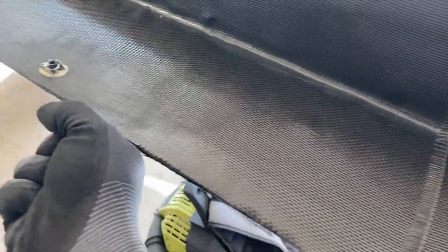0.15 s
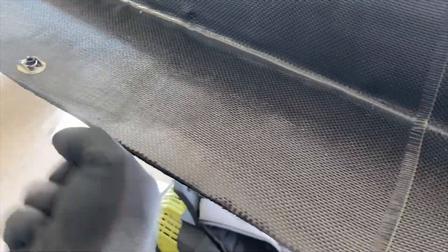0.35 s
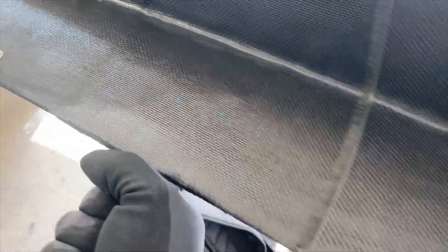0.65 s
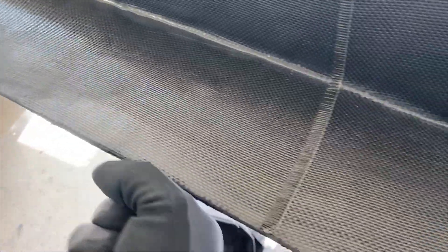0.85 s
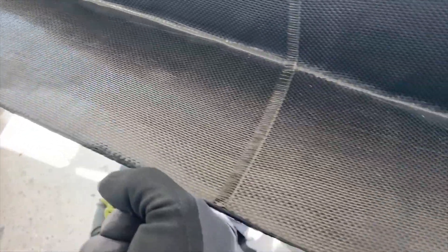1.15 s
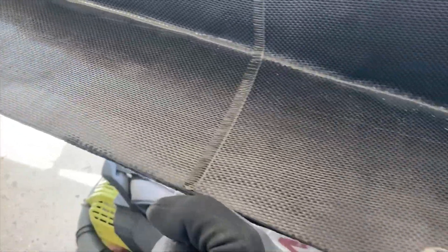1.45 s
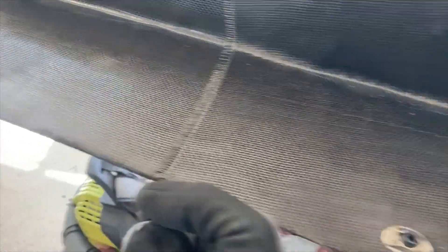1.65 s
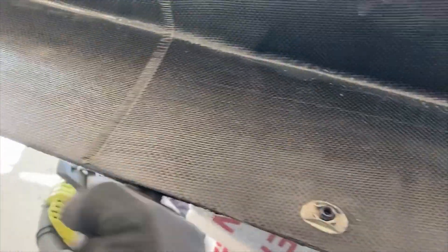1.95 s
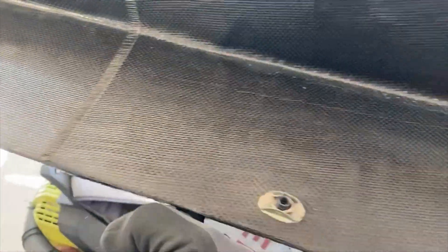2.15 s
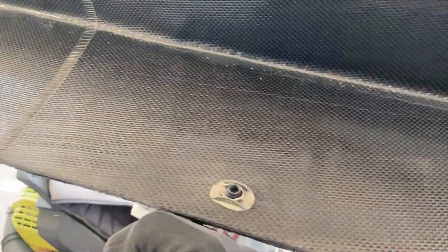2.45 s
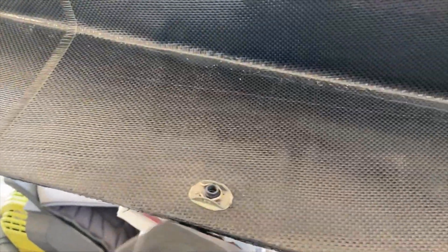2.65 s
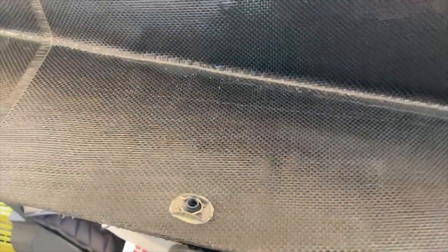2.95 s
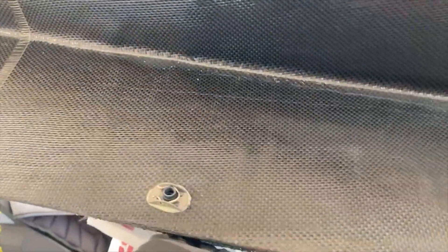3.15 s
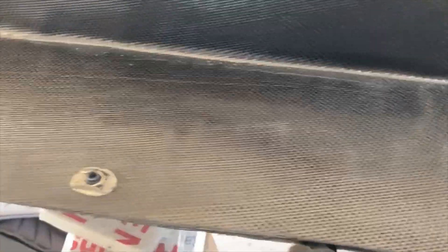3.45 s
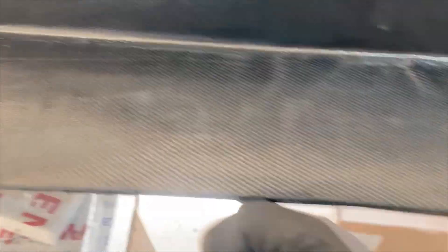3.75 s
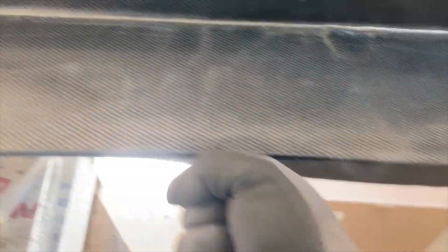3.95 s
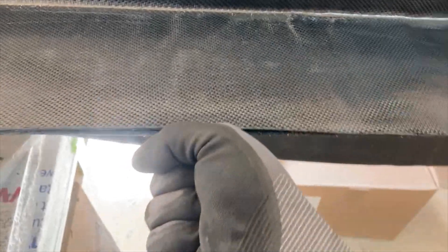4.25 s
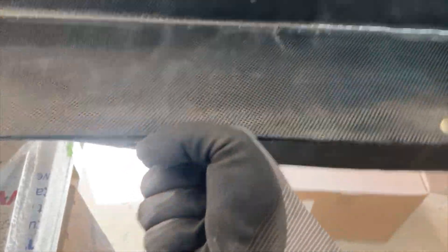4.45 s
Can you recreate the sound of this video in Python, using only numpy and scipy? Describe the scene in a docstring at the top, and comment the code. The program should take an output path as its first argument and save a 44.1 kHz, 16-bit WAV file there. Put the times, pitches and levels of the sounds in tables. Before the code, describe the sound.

A carbon-fibre shell peels away from the form beneath it in uneven bursts, heard from close by. Light ticks and crackles come first, over soft glove scuffing. A brief pause follows, then harder pulls set off bright, sharp cracks and a quick volley of snaps, the shell booming and creaking with a faint low rumble. A final crack ends it, with a short workshop echo.

```python
"""A workshop, close up: a cured carbon-fibre mould half is pried off its plug.
Each pull peels the bond in a fizz of tiny fractures and makes the big shell boom;
larger patches let go with sharp cracks that ring in the laminate and hang in the room.
Underneath, a glove rubs the flange and the loosened shell sways with a low rumble."""
import sys
import numpy as np
from scipy import signal
from scipy.fft import rfft, irfft
from scipy.io import wavfile
from scipy.ndimage import uniform_filter1d

SR = 44100
rng = np.random.default_rng(int(sys.argv[2]) if len(sys.argv) > 2 else 0)


def file_out(sig):
    """Save sig as 16-bit WAV at sys.argv[1]."""
    # one column per channel
    cols = np.atleast_2d(sig).T
    # limit, then scale
    lim = np.clip(cols, -1, 1)
    pcm = np.round(lim * 32767).astype(np.int16)
    wavfile.write(sys.argv[1], SR, pcm)


N = 202181
LEAD = 256  # samples of tearing ahead of each crack

# pulls that advance the peel:
# t/s, length/s, shell boom/dB, boom pitch/Hz, panel knock/dB, laminate creak/dB, fizz/dB
PULLS = [(0, 0.09, -47, 171, -49.5, -56, -42), (0.224, 0.045, -51, 158, -44.5, -55, -45),
         (0.344, 0.086, -32.5, 164.5, -35.5, -50.5, -50), (0.476, 0.084, -36, 167, -44, -46, -62),
         (0.609, .06, -34.5, 135, -43.5, -50.5, -50.5), (0.728, 0.033, -34, 152, -36, -39.5, -41.5),
         (0.814, 0.082, -31.5, 143, -45, -48, -41.5), (1.001, 0.099, -34.5, 127, -42.5, -52, -49.5),
         (1.161, 0.12, -32.5, 132.5, -52.5, -52.5, -48), (1.26, 0.087, -32, 155.3, -42, -43.5, -49),
         (1.943, 0.059, -28, 154.2, -37, -37.5, -37), (2.024, 0.04, -21, 142.5, -34.5, -40, -40),
         (2.234, .025, -38.5, 160, -43.5, -45.5, -59), (2.301, 0.056, -27.5, 178.3, -34.5, -53, -40.5),
         (2.447, 0.038, -40, 180.5, -57, -74, -69), (2.648, 0.076, -28.5, 160.3, -30.5, -41, -40),
         (3.199, 0.1, -22, 142, -30.5, -36, -37.5), (3.301, .1, -28, 146, -44, -34.5, -35),
         (3.457, 0.056, -37.5, 141.4, -55, -61, -69), (3.618, .07, -22.5, 129.4, -28.5, -34, -41.5),
         (3.879, 0.054, -29.5, 148, -28, -34.5, -45.5), (4.011, 0.039, -46.5, 162, -47, -45.5, -52)]
# ring of the stiff laminate: f/Hz, level/dB, t60/s
LAMINATE_MODES = [(478, 0, 0.076), (632, -43, 0.0086), (775, 1.5, 0.072), (860, 3.5, 0.048),
                  (948, 5.5, 0.0093), (1178, 0, 0.069), (1274, 7, 0.035), (1580, 2.5, 0.033),
                  (1930, 5, 0.026), (2620, 5, 0.017), (3060, 8, 0.0073), (3970, -5.5, 0.026)]
# the laminate's crowd of close modes, heard as a noisy crunch: f/Hz, level/dB
CRUNCH_SPECTRUM = [(50, -28), (140, 1), (300, 0.5), (520, 1.5), (800, -1), (1050, 3), (1500, 2.5),
                   (2200, 3), (2900, -2.5), (4300, -10), (7000, -5.5), (11000, -16), (16000, -40)]


def cracks():
    """Patches of the bond let go: returns the sharp direct hits and a softer-edged room send."""
    # the larger breaks: t/s, snap/dB, ring/dB, snap tilt/(dB per octave), ring centre/Hz, room send/dB
    breaks = [(0.0326, -20.5, -52, 3, 1680, -2), (0.038, -23.5, -48, 7, 1710, 13),
              (0.05, -24, -63, 0, 1650, -2), (0.0735, -41, -60, 9, 1180, 8),
              (0.2511, -32.5, -53.5, 9, 1400, 19), (0.35, -24.5, -46, -2, 1300, 6.5),
              (0.3622, -24, -33, 9, 1050, 3), (0.4127, -20.5, -57, 4.5, 1510, 10),
              (0.4174, -18.5, -38, 0.5, 1540, 4), (0.4928, -13.5, -28.5, 0, 1390, 6),
              (0.498, -21, -27.5, -10, 475, -16), (0.6274, -25, -40, -2, 1480, 3.5),
              (0.7428, -19.5, -32, 0.5, 1706, 2), (0.762, -37, -35.5, 8, 1140, 3),
              (0.8339, -10.5, -21.5, -2.5, 1777, 1), (0.843, -40, -34, 0, 2050, 5),
              (0.8689, -31, -37, 11, 1790, 2.5), (0.9891, -37, -39, 11, 1456, 5.5),
              (1.051, -27.5, -37, 0, 1315, -4), (1.0587, -29.5, -51, 9, 1200, 9),
              (1.2361, -14, -31.5, -2, 1410, 2.5), (1.239, -36, -32, 5, 485, 2.5),
              (1.4249, -12, -33, 4, 1620, 5), (1.436, -22, -30, -2.5, 940, 0.5),
              (1.9522, -36, -37, 13, 1240, 8.5), (1.977, -30, -35.5, 2, 1280, 11),
              (2.0027, -13.5, -36.5, 0.5, 1300, 3), (2.0104, -15, -31.5, -0.5, 948, 2.5),
              (2.293, -6.5, -19, -9.5, 1400, -3), (2.297, -36, -29, -4, 1340, 2),
              (2.4834, -28, -43.5, -1, 1102, 2.5), (2.727, -26.5, -39, 2.5, 1505, 10),
              (2.7584, -3, -23.5, 2.5, 1290, -6), (2.761, -15.5, -21, -2.5, 882, 4.5),
              (2.9085, -8.5, -24.5, 9.5, 2440, 1.5), (2.9111, -6.5, -42, 6, 1140, -5),
              (2.9589, -25, -41, -4.5, 1490, 6), (3.091, -30.5, -77, 9, 1580, -15),
              (3.1026, -25, -53.5, 5, 1780, -7), (3.2346, -20.5, -39.5, 12.5, 1400, 18),
              (3.3199, -9, -26, -3.5, 1200, -1), (3.3274, -5.5, -25, -0.5, 1300, 3.5),
              (3.3413, -11.5, -24, -1.5, 1414, 0), (3.3482, -26, -28, 0, 1280, 1),
              (3.3598, -4, -23, -2, 1350, -5), (3.3627, -12.5, -27, 3, 1330, -1.5),
              (3.367, -11, -29.5, -2.5, 1340, 2), (3.3984, -10.5, -38, -3.5, 1430, -8),
              (3.4871, -31.5, -43.5, 7, 1500, 7), (3.648, -12.5, -29.5, -1, 1300, -2),
              (3.6594, -7.5, -30, -1.5, 1380, -0.5), (3.6711, -17, -36, 2.5, 1310, -14),
              (3.8825, -54, -33.5, -3, 1256, 3.5), (3.915, -26, -30, 10, 1297, -9),
              (3.922, -39.5, -32.5, 6, 800, 6.5), (4.0133, -15, -40, 2, 1050, -9),
              (4.42, -11.5, -33, 1, 1360, 0), (4.4214, -15, -38.5, 2, 3000, 0)]
    direct, send = np.zeros((2, 2, N))
    for start_s, *voicing, send_db in breaks + ticks():
        start = max(int(start_s * SR) - LEAD, 0)
        near = one_crack(*voicing, rise_s=0.0006, crunch_db=-2, tone_db=-2)[:, :N - start]
        # the whole shell radiates into the room, which smears the attack
        far = one_crack(*voicing, rise_s=0.0025, crunch_db=-0.5, tone_db=-6)[:, :N - start]
        span = slice(start, start + near.shape[1])
        direct[:, span] += near
        send[:, span] += from_db(send_db) * far
    return direct, send


def one_crack(snap_db, ring_db, tilt_db, centre_hz, rise_s, crunch_db, tone_db,
              crunch_s=0.0068, max_lag_s=0.0003, size=4096):
    """One break: a bright snap on top, then crunch and ringing in the laminate."""
    since_break = (np.arange(size) - LEAD) / SR
    t = np.maximum(since_break, 0)
    transient = snap(since_break, rise_s, tilt_db)
    onset = 1 - np.exp(-t / rise_s)
    burst = stereo_noise(width=0.39, size=size) * onset * np.exp(-t / crunch_s)
    crunch = colour(burst, CRUNCH_SPECTRUM, size=1024)
    tone = onset * laminate_tone(t, centre_hz)
    crunch, tone = (x / np.std(x[:, LEAD:LEAD + SR // 100]) for x in (crunch, tone))  # level over 10 ms
    body = from_db(crunch_db) * crunch + from_db(tone_db) * tone
    left, right = from_db(snap_db) * transient + from_db(ring_db) * body * from_db([[-1], [1]])
    # the break lies to the right, so the left side hears it a little later
    return np.array([np.roll(left, int(max_lag_s * SR * rng.uniform(0, 1))), right])


def snap(since_break, rise_s, tilt_db, tear_s=0.0022, scatter_s=0.0093, skirt_db=-20, rib_echo=0.34):
    """The crack's leading edge: bending waves smear the break into a short burst of noise."""
    # colour of the breaking bond: f/Hz, level/dB
    snap_spectrum = [(300, -6.5), (900, -37), (2000, -12), (2850, 2.5), (3500, 0.5), (5200, -1), (7000, 0),
                     (8200, 8.5), (9800, -3.5), (11300, 5.5), (13300, -10.5), (14700, 1.5), (16000, -32.5)]
    t = np.maximum(since_break, 0)
    front = (t / rise_s) ** 2 * np.exp(2 * (1 - t / rise_s))
    # the bond tears for a moment before it gives; waves scatter in the shell afterwards
    skirt = np.exp(np.minimum(since_break, 0) / tear_s - t / scatter_s)
    burst = stereo_noise(width=0.33, size=len(t)) * (front + from_db(skirt_db) * skirt)
    hit = colour(burst, snap_spectrum, np.clip(tilt_db, -7, 9), size=512)
    echo_s = rng.uniform(0.00043, 0.0015)  # one bounce off the nearest rib
    hit += rib_echo * np.roll(hit, int(echo_s * SR), axis=1)
    return hit * np.sqrt(0.001 * SR / np.sum(hit ** 2 / 2))  # energy of 1 ms at unit level


def laminate_tone(t, centre_hz, reach_octaves=0.14):
    """The pitched tail of a crack: each spot of the shell favours other modes, slightly detuned."""
    hz, db, t60 = np.transpose(LAMINATE_MODES)[:, :, None]
    hz = hz * np.exp(rng.normal(0, 0.025, hz.shape))
    emphasis = 0.2 + np.exp(-(np.log2(hz / centre_hz) / reach_octaves) ** 2)
    strength = from_db(db + rng.normal(0, 1, hz.shape)) * emphasis
    # each mode arrives left and right with a phase of its own
    phase = rng.uniform(0, 2 * np.pi, len(hz)) + rng.normal(0, 0.35, (2, len(hz)))
    partials = strength * np.exp((2j * np.pi * hz - np.log(1000) / t60) * t)
    return np.imag(np.exp(1j * phase) @ partials)


def ticks(per_pull=2, over_fizz_db=9, over_creak_db=-5.5, scatter_db=2.5,
          tilt_db=4, centre_hz=1290, send_db=4):
    """Cues for the small cracks each pull sheds at random moments, scaled to its fizz and creak."""
    return [(start + length * rng.uniform(0.25, 1.1),
             fizz_db + over_fizz_db + scatter_db * rng.normal(),
             creak_db + over_creak_db, tilt_db, centre_hz, send_db)
            for start, length, *_, creak_db, fizz_db in PULLS for _ in range(per_pull)]


def peeling():
    """The peel front creeps on in small slips that fizz, rattle the laminate and shake the shell."""
    # knock of the panels between the ribs: f/Hz, level/dB, t60/s
    panel_modes = [(199.2, 4.5, 0.095), (261.8, 2, 0.09), (302, 3.5, 0.038), (407, 5, 0.028),
                   (506.5, -4.5, 0.093), (552, -1, 0.018)]
    # sizzle of the tiny fractures: f/Hz, level/dB
    fizz_spectrum = [(400, -22.5), (1500, -1.5), (3000, -3.5), (4500, -0.5), (6000, -6.5), (7800, 6.5),
                     (9800, -6), (11400, 4.5), (13300, -14.5), (14800, -1), (16000, -16.5)]
    starts, lengths, boom_db, boom_hz, knock_db, creak_db, fizz_db = np.transpose(PULLS)
    boom = pull_gain(boom_db, lag_s=0.016, attack_s=0.0036, release_s=0.035, tail_db=-15.5, tail_s=0.12)
    knock = pull_gain(knock_db, lag_s=0.0021, attack_s=0.0032, release_s=0.031, tail_db=-7, tail_s=0.1)
    creak = pull_gain(creak_db, lag_s=0.0059, attack_s=0.0067, release_s=0.014,
                      tail_db=-21.5, tail_s=0.06)
    fizz = pull_gain(fizz_db, lag_s=0.0037, attack_s=0.012, release_s=0.033, tail_db=-17, tail_s=0.05)
    pitch_hz = np.interp(np.arange(N) / SR, starts + lengths / 2, boom_hz)
    slips = fractures(per_s=320, spread_db=3, length_s=0.00027, width=0.2)
    jerks = fractures(per_s=240, spread_db=6, length_s=0.00029, width=0.17)
    grains = fractures(per_s=1100, spread_db=4.5, length_s=0.00055, width=0.85)
    peel = boom * shell_groan(slips, pitch_hz)
    peel += knock * levelled(ring_modes(jerks, panel_modes), window_s=0.026) * from_db([[-0.8], [0.8]])
    peel += creak * laminate_creak(grains) * from_db([[-1], [1]])
    return peel + fizz * levelled(colour(grains, fizz_spectrum), window_s=0.051)


def pull_gain(levels_db, lag_s, attack_s, release_s, tail_db, tail_s):
    """One layer's envelope over all pulls: it lags the hand, holds, drops and leaves a settling tail."""
    starts, lengths = np.transpose(PULLS)[:2]
    timing = starts + lag_s, lengths - lag_s
    return np.maximum(swells(*timing, levels_db, attack_s, release_s),
                      swells(*timing, levels_db + tail_db, attack_s, tail_s))


def fractures(per_s, spread_db, length_s, width):
    """Tiny breaks at random moments, few large and many small, each a brief spurt of noise."""
    triggers = rng.random(N) < per_s / SR
    sizes = triggers * from_db(spread_db * np.minimum(rng.exponential(1, N), 4))
    spurts = signal.lfilter([1], [1, -np.exp(-1 / (length_s * SR))], sizes + 1e-12)
    return spurts * stereo_noise(width)


def shell_groan(slips, pitch_hz, steady_db=-7, rough_db=-3):
    """The sticking bond drives the shell's bending tone: a steady core, roughened by uneven slips."""
    steady = np.sqrt(2) * np.sin(2 * np.pi * (np.cumsum(pitch_hz) / SR + rng.random()))
    thuds = ring(slips, hz=137, t60=0.022)
    rough = levelled(bending(thuds, pitch_hz, width_hz=28), window_s=0.04)
    return levelled(from_db(steady_db) * steady + from_db(rough_db) * rough, window_s=0.09)


def bending(force, pitch_hz, width_hz):
    """The shell's main bending resonance; its pitch glides as the grip and the free span change."""
    carrier = np.exp(2j * np.pi * np.cumsum(pitch_hz) / SR)
    lowpass = signal.butter(2, width_hz / 2, fs=SR, output="sos")
    return np.real(carrier * signal.sosfilt(lowpass, force * carrier.conj()))


def laminate_creak(grains, modes_db=-3, flange_db=-1, crunch_db=-12):
    """A stream of tiny breaks keeps the laminate and the squeezed flange ringing."""
    # hollow voice of the flange: f/Hz, level/dB, t60/s
    flange_modes = [(423, -6, 0.065), (820, -8.5, .035), (1291, 2, 0.045), (1373, -1.5, 0.01)]
    creak = from_db(modes_db) * levelled(ring_modes(grains, LAMINATE_MODES), window_s=0.021)
    creak += from_db(flange_db) * levelled(ring_modes(grains, flange_modes), window_s=0.055)
    return creak + from_db(crunch_db) * levelled(colour(grains, CRUNCH_SPECTRUM), window_s=0.028)


def glove():
    """Fabric slides over the weave: dense, soft catches."""
    # strokes along the flange: t/s, length/s, level/dB
    strokes = [(0, 0.027, -40), (0.277, 0.23, -42), (0.68, 0.63, -49.5), (4.14, 0.048, -48.5),
               (4.28, 0.258, -48)]
    # dull scuff of the fabric: f/Hz, level/dB
    rub_spectrum = [(150, -8.5), (300, 0.5), (450, 7.5), (700, 2), (1200, -1), (2000, -2.5), (3000, -5.5),
                    (5000, -15.5), (8000, -14.5), (16000, -34)]
    catches = fractures(per_s=2200, spread_db=2, length_s=0.0008, width=0.9)
    scuff = levelled(colour(catches, rub_spectrum), window_s=0.053)
    return swells(*np.transpose(strokes), attack_s=0.035, release_s=0.082) * scuff


def sway():
    """The loosened shell rocks in the hand and pushes air at the listener."""
    # rocking movements: t/s, length/s, level/dB
    movements = [(0, 1.53, -51.5), (.26, 0.17, -43), (1.98, .06, -46), (2.304, 0.076, -38),
                 (2.662, 0.033, -34.5), (3.65, .23, -51.5), (3.927, 0.041, -32), (4.05, 0.03, -45.5)]
    # low end of the pushed air: f/Hz, level/dB
    rumble_spectrum = [(15, -39), (28, -31), (45, -4.5), (65, -2.5), (90, -4), (130, -4.5), (300, -45)]
    rumble = levelled(colour(stereo_noise(width=0.16), rumble_spectrum), window_s=0.94)
    return swells(*np.transpose(movements), attack_s=0.01, release_s=0.057) * rumble


def workshop_reverb(send, build_s=0.0014, bands=10):
    """Diffuse reflections build up quickly and die away, the treble first."""
    # decay of the room: f/Hz, t60/s
    decay_times = [(120, 0.75), (500, 0.5), (2000, 0.4947), (5000, 0.4245), (9000, 0.4), (15000, 0.3)]
    # reverb return against its input: f/Hz, level/dB
    return_levels = [(120, -21), (400, -0.5), (1300, -9.5), (3000, -7.5), (6000, -6.5), (9000, -23),
                     (15000, -20.5)]
    t = np.arange(SR) / SR
    edges_hz = np.geomspace(60, 19000, bands + 1)
    response = 0
    for low, high in zip(edges_hz, edges_hz[1:]):
        hz = np.sqrt(low * high)
        decay = np.exp(-np.log(1000) * t / at_hz(decay_times, hz)) * (1 - np.exp(-t / build_s))
        bandpass = signal.butter(2, [low, high], "band", fs=SR, output="sos")
        band = signal.sosfilt(bandpass, stereo_noise(width=hz / (hz + 250), size=SR))
        response += from_db(at_hz(return_levels, hz)) * band * decay / np.linalg.norm(decay)
    return signal.fftconvolve(send, response, axes=1)[:, :N]


def room_tone(level_db=-55.5):
    """A faint, steady bed of dark noise."""
    # the quiet workshop: f/Hz, level/dB
    air_spectrum = [(20, -25.5), (45, -7), (110, 2), (300, -17.5), (440, -9), (650, -17.5), (2000, -21),
                    (5000, -35.5), (9000, -40), (16000, -50.5)]
    return from_db(level_db) * colour(stereo_noise(width=0.49), air_spectrum)


def from_db(db):
    """Decibels to gain."""
    return 10 ** (np.asarray(db) / 20)


def at_hz(points, hz):
    """Read a table on a log-frequency axis."""
    f, value = np.transpose(points)
    return np.interp(np.log(np.maximum(hz, 1)), np.log(f), value)


def colour(x, spectrum, tilt_db=0, size=8192):
    """Minimum-phase EQ of unit power gain, tilted by tilt_db per octave above 2 kHz."""
    hz = np.fft.rfftfreq(size, 1 / SR)
    octaves = np.log2(np.maximum(hz / 2000, 1))
    cepstrum = irfft(np.log(from_db(at_hz(spectrum, hz) + tilt_db * octaves)))
    causal = 2 * cepstrum[:size // 2] * (np.arange(size // 2) > 0)
    response = irfft(np.exp(rfft(causal, size)))
    return signal.fftconvolve(x, response[None] / np.linalg.norm(response))[:, :x.shape[1]]


def ring(x, hz, t60):
    """One resonator: a unit click sets a sine of height 1 ringing."""
    radius, angle = np.exp(-np.log(1000) / (t60 * SR)), 2 * np.pi * hz / SR
    return signal.lfilter([0, np.sin(angle)], [1, -2 * radius * np.cos(angle), radius ** 2], x + 1e-18)


def ring_modes(force, modes):
    """A force sets a family of modes ringing, in alternating polarity."""
    return sum((-1) ** k * from_db(db) * ring(force, hz, t60) for k, (hz, db, t60) in enumerate(modes))


def stereo_noise(width, size=N):
    """White noise whose side signal is width times as strong as its mid."""
    mid, side = rng.standard_normal((2, size))
    return (mid + width * side * np.array([[1], [-1]])) / np.sqrt(1 + width ** 2)


def levelled(x, window_s):
    """Ride the running power to 1, leaving faster detail alone."""
    size = int(window_s * SR / 2)
    power = uniform_filter1d(uniform_filter1d(np.mean(x ** 2, axis=0), size), size)
    return x / np.sqrt(np.maximum(power, 0) + 1e-4 * power.mean())


def swells(starts, lengths, levels_db, attack_s, release_s):
    """Envelope of a series of movements: each swells in, holds for its length and dies away."""
    t = np.arange(0, N, 16) / SR
    power = 0
    for start, length, db in zip(starts, lengths, levels_db):
        rise = 0.5 + 0.5 * np.tanh((t - start) / (2 * attack_s))
        fall = np.exp(-np.maximum(t - start - length, 0) / release_s)
        power += (from_db(db) * rise * fall) ** 2
    return np.interp(np.arange(N) / SR, t, np.sqrt(power))


def scene(handling_send_db=-7.5):
    """Cracks, peel and glove up front with their reverb; sway and room tone underneath."""
    direct_cracks, crack_send = cracks()
    handling = peeling() + glove()
    bed = room_tone()
    reverb = workshop_reverb(crack_send + from_db(handling_send_db) * handling)
    return direct_cracks + handling + reverb + sway() + bed


def record(dry, ceiling=1.1, cutoff_hz=16300):
    """Soft clipping rounds the tallest peaks and a steep low-pass trims the top."""
    lowpass = signal.ellip(10, 0.2, 80, cutoff_hz, fs=SR, output="sos")
    return signal.sosfilt(lowpass, ceiling * np.tanh(dry / ceiling))


dry = scene()
out = record(dry)
file_out(out)
```